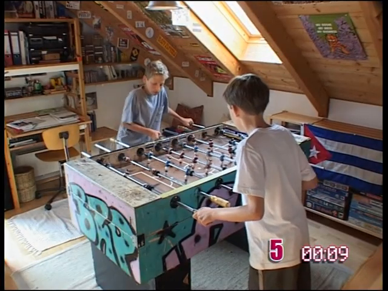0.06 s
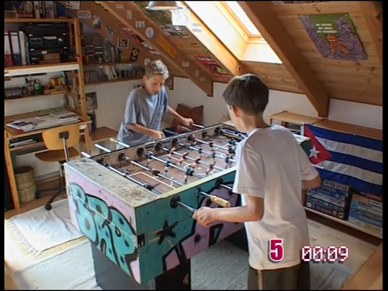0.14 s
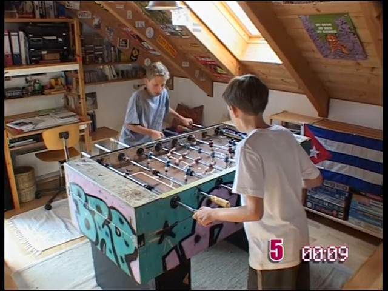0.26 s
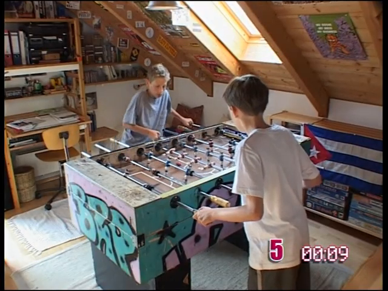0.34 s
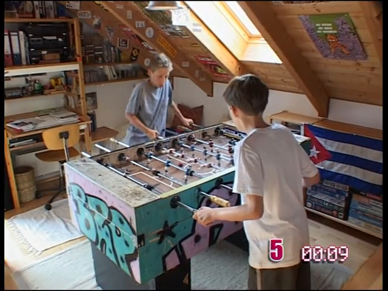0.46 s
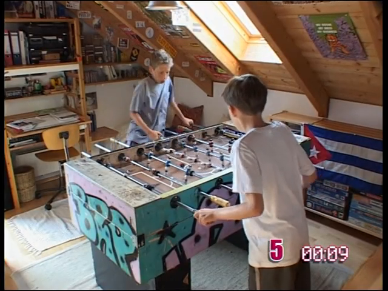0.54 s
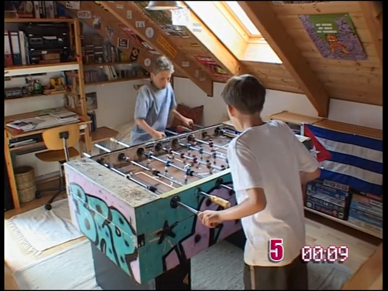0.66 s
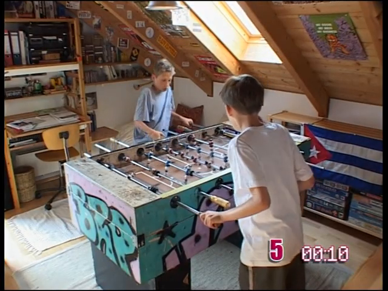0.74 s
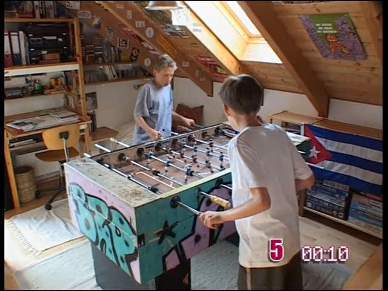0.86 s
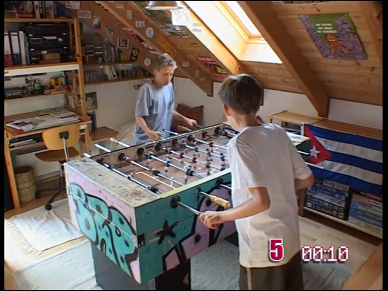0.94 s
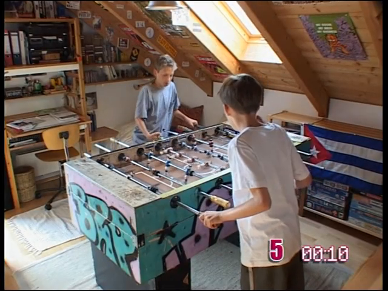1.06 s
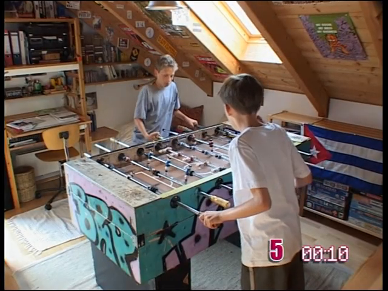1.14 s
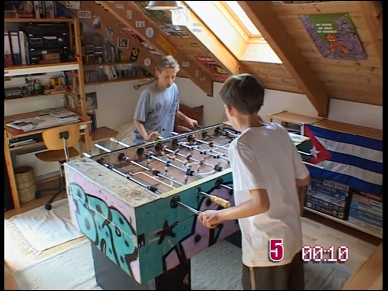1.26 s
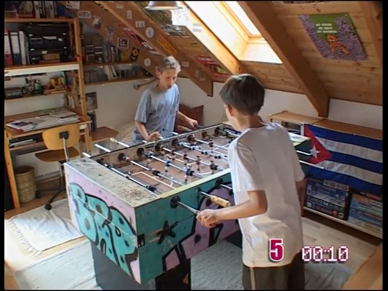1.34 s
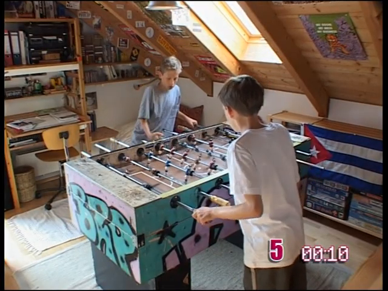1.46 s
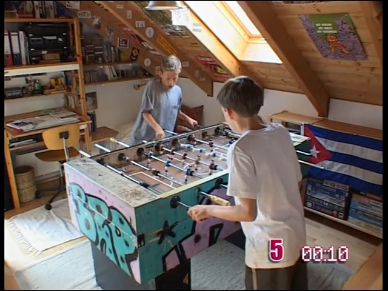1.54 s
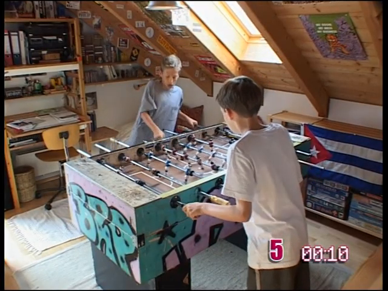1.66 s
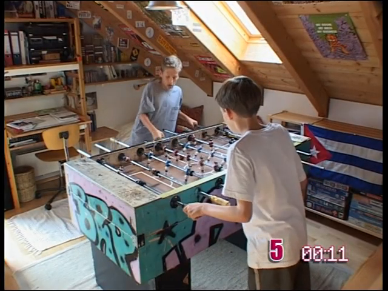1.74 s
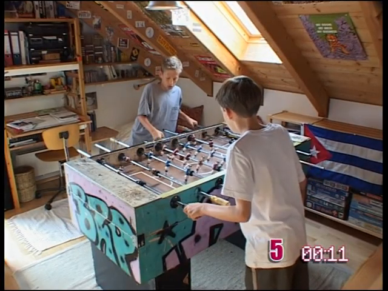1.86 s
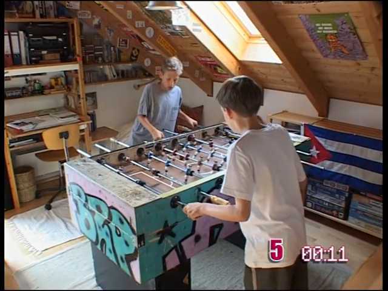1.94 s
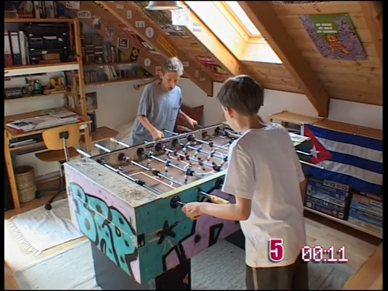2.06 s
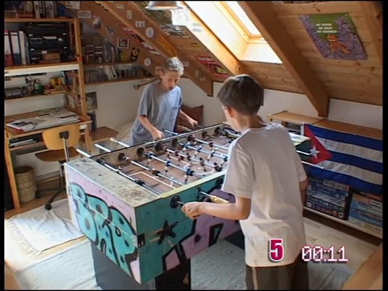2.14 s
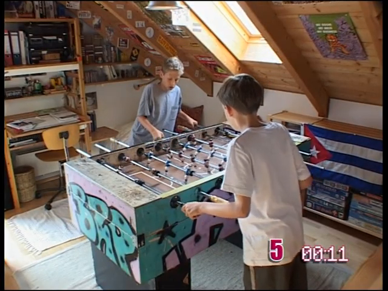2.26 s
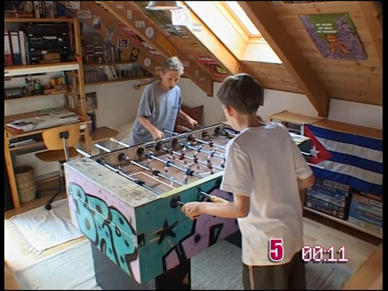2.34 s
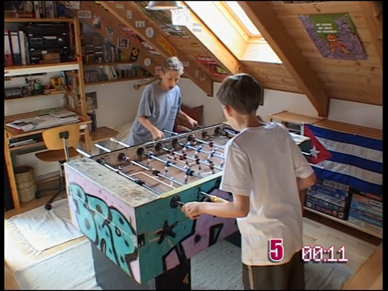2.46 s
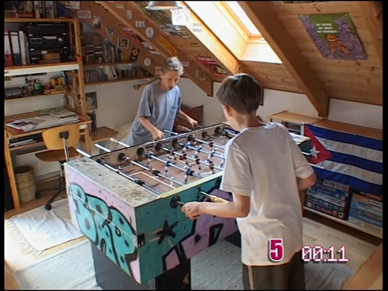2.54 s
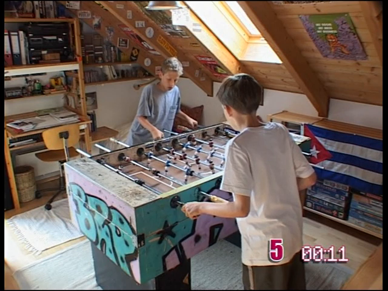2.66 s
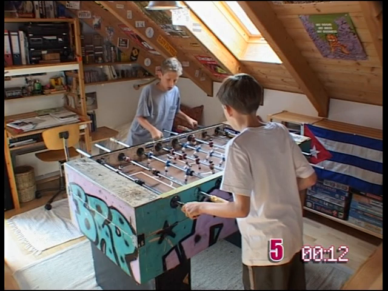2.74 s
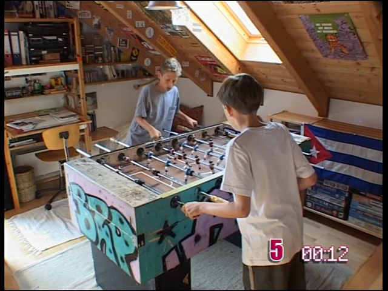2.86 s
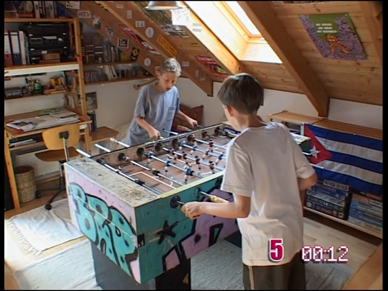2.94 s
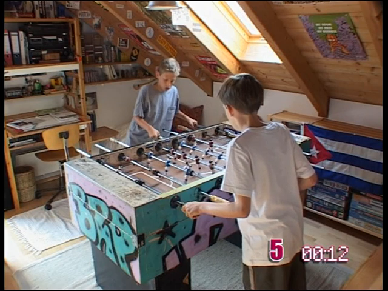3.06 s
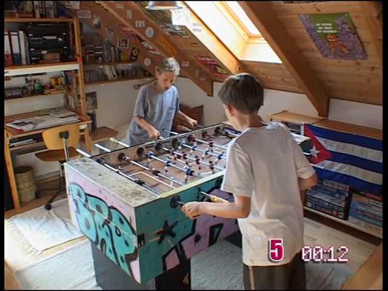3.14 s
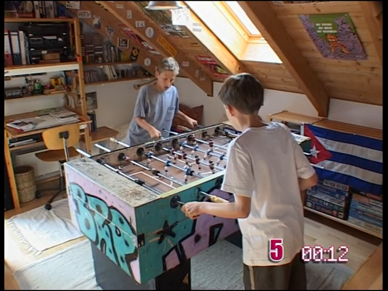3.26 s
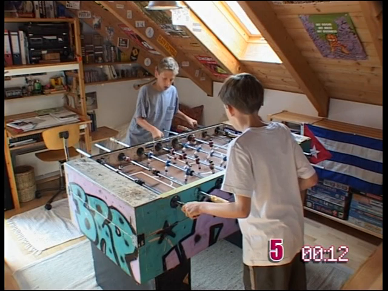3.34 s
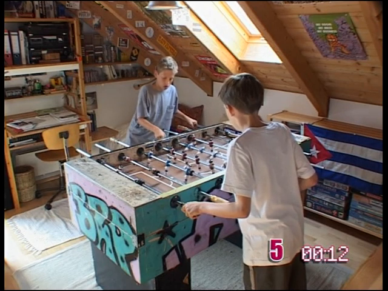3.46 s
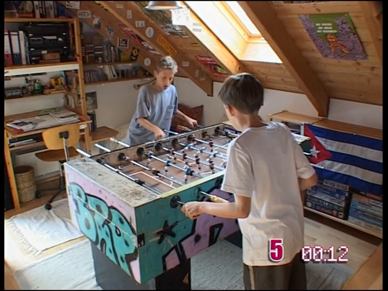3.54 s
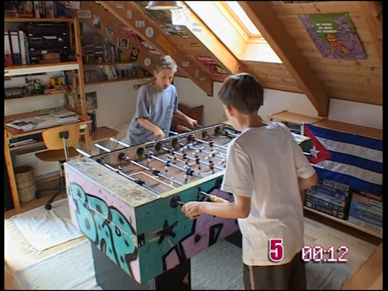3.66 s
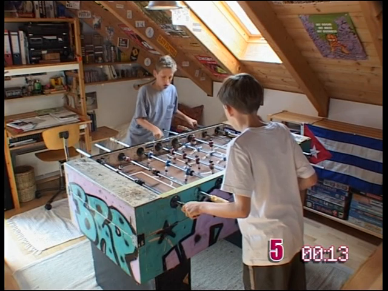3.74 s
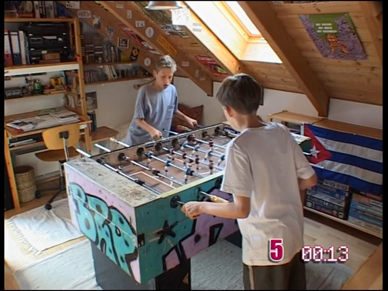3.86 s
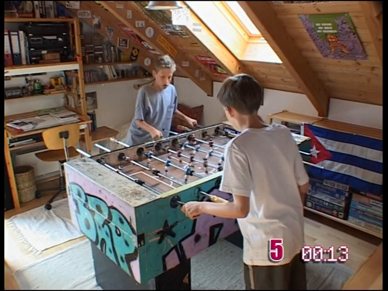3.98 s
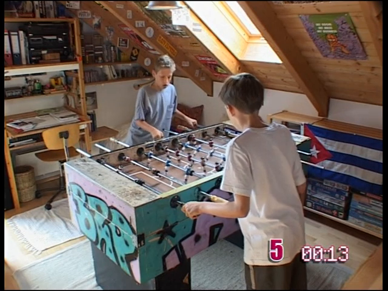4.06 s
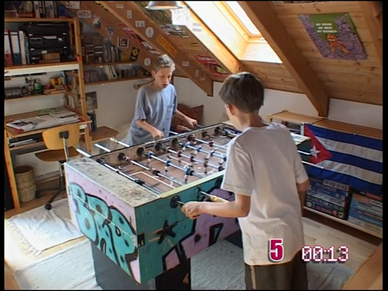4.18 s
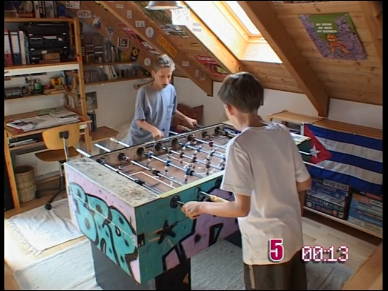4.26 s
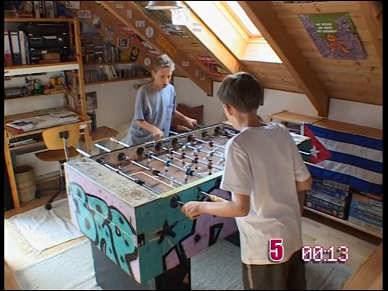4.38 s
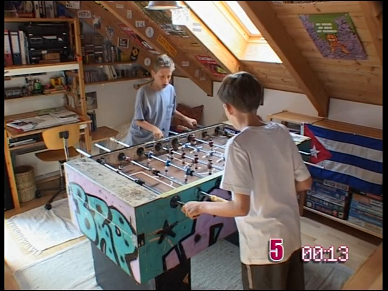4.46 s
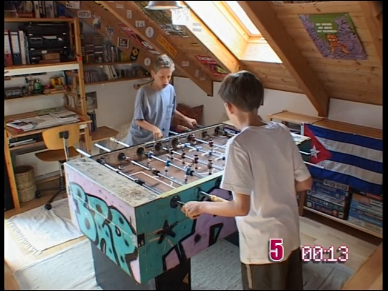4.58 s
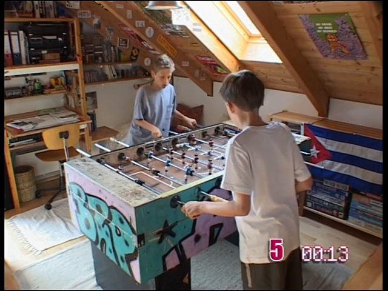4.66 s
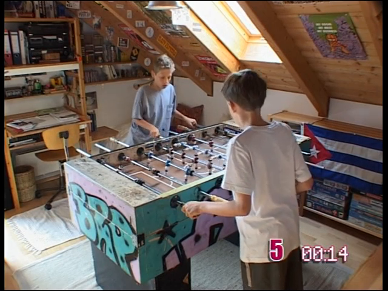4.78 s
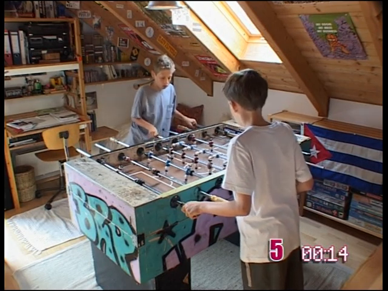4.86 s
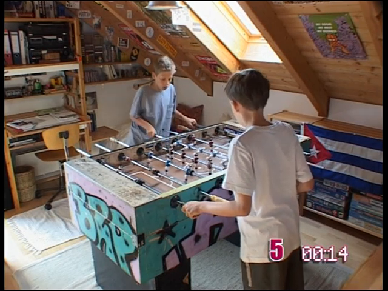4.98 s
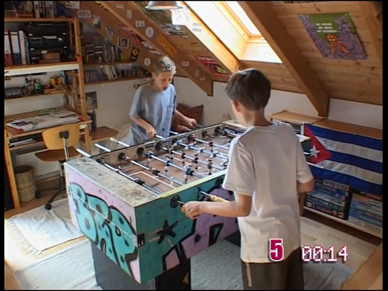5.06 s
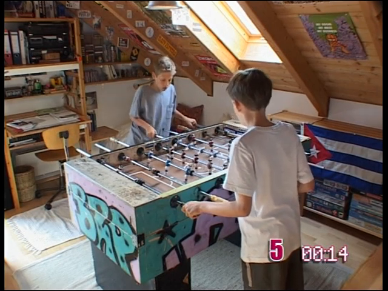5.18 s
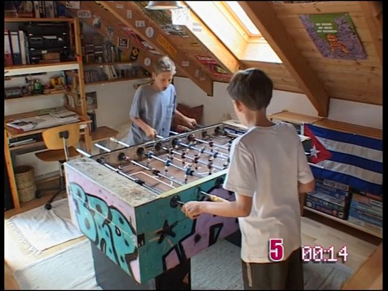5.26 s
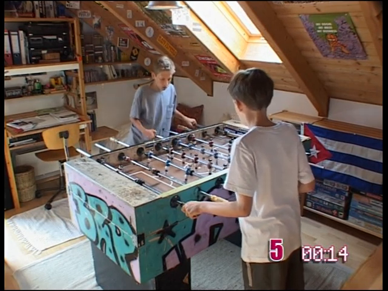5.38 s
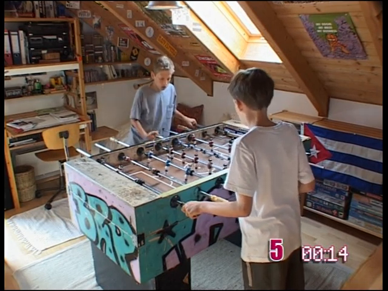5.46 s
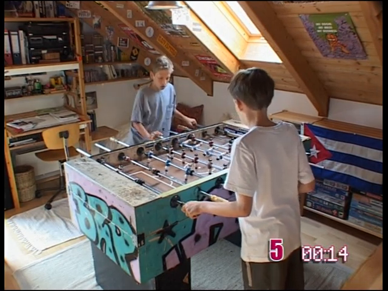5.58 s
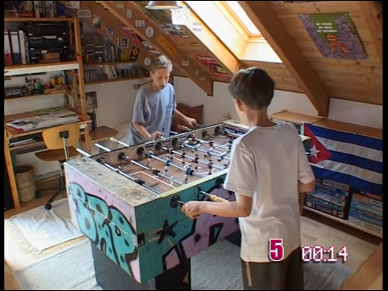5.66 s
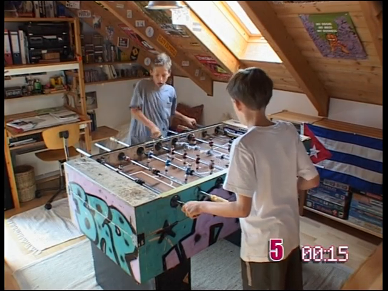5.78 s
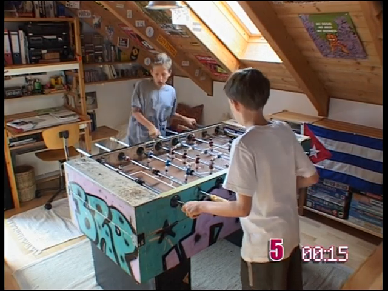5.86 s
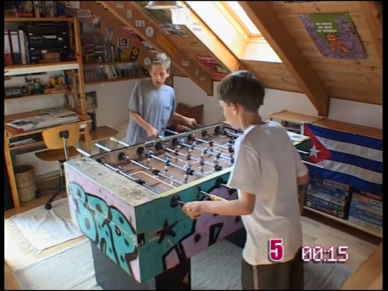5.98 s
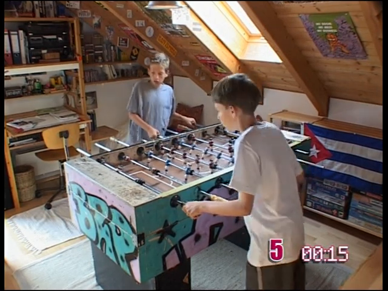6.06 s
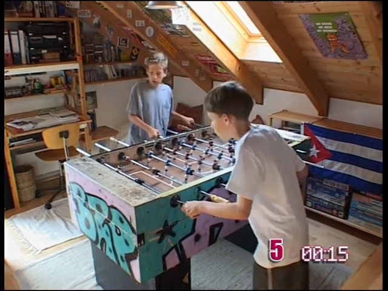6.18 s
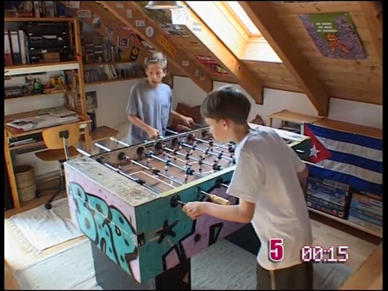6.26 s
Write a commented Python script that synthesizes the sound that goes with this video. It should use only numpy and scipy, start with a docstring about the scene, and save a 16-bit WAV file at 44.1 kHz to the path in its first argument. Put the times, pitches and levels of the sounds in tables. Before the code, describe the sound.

Table football is played in a small wood-lined room, heard from about two metres away. Light taps lead into a burst of hard plastic clacks and hollow wooden knocks that make the table ring and boom. Play thins to a few soft, scattered knocks and faint rod slides, then ends in a loud flurry as the ball slams into the end wall. A faint hum and hiss lie underneath.

```python
"""Knocks from the start, with soft rod slides between them, over a faint hum and hiss: table football
in a wood-lined attic, two metres away. Figures hit the ball and rods bump their stops: the playfield
rings, the cabinet booms, hard shots clack. Rods click in their bearings; a last shot slams into the end
wall. Gain control ducks everything after loud hits."""
import sys
import numpy as np
from scipy import signal
from scipy.fft import rfft, irfft
from scipy.io import wavfile
from scipy.ndimage import uniform_filter1d

SR = 44100
rng = np.random.default_rng(int(sys.argv[2]) if len(sys.argv) > 2 else 0)


def transcribe(signal):
    """Save signal, clipped to [-1, 1], as a 16-bit WAV file at the path in sys.argv[1]."""
    frames = np.atleast_2d(signal).T
    limited = np.clip(frames, -1, 1)
    pcm = np.round(limited * 32767).astype(np.int16)
    wavfile.write(sys.argv[1], SR, pcm)


N = 278271

# Rods and ball sliding. Each row: start in seconds, length in seconds, top level in dB, centre in Hz.
SLIDE_STROKES = [(0.0, 0.3, -60, 536), (0.442, 0.6, -62, 524), (1.154, 0.71, -64, 514),
                 (2.872, 0.23, -62.5, 720), (3.118, 0.21, -64.5, 537), (3.343, 0.24, -62, 695),
                 (4.33, 0.26, -65.5, 550), (4.577, 0.18, -65, 1390), (5.695, 0.4, -59, 640),
                 (5.92, 0.11, -39, 870)]
# Room rumble and hiss. Each row: frequency in Hz, relative density in dB.
FLOOR_SPECTRUM = [(12, -33.5), (20, -3.5), (58, -2.5), (74, -12.5), (104, -10), (150, -15), (172, -24),
                  (216, -2.5), (248, -14.5), (446, -20), (738, -23), (873, -21.5), (1610, -29),
                  (10800, -31.5), (16000, -29.5)]
# Likeness of that noise left and right. Each row: frequency in Hz, correlation.
FLOOR_COHERENCE = [(60, 0.2), (150, 0.9), (380, 0.92), (950, 0.98), (2380, 0.99), (5980, 0.59),
                   (15000, 0.87)]
# Hum. Each row: frequency in Hz, level in dB.
HUM_TONES = [(48.4, -72), (100, -76.5), (142, -73), (216, -67), (350, -78)]
# Thin high hiss. Each row: time in seconds, level in dB.
HISS_ENVELOPE = [(0, -71.5), (0.7, -68.5), (1.6, -68), (2.15, -68.5), (2.26, -89)]
# Ball meets figure or wall. Each row: start in seconds, knock in dB, contact corner in Hz,
# cabinet boom in dB, pitch the struck spot favours in Hz, plastic clack in dB.
BALL_HITS = [ (0.037, -60, 560, -58.5, 300, -84), (0.2508, -47.5, 620, -39, 225, -67),
             (0.2963, -41.5, 1120, -46.5, 590, -70), (0.620, -44.5, 940, -47.5, 738, -71),
             (0.696, -39.5, 360, -55, 274, -79), (0.7237, -22.5, 1790, -40.5, 258, -32),
             (0.781, -25.5, 2100, -39, 1275, -20.5), (1.4462, -37, 600, -39, 230, -60),
             (1.451, -28.5, 970, -29.5, 985, -48.5), (1.594, -33.5, 1050, -39.5, 264, -58),
             (1.766, -29, 1780, -32, 214, -46), (2.493, -43, 540, -35.3, 185, -66),
             (2.884, -64.5, 600, -59, 382, -92), (3.289, -53, 570, -43, 244, -82),
             (3.530, -43.5, 605, -44, 620, -62), (3.956, -41, 1700, -34.5, 290, -63.5),
             (5.0725, -51.5, 820, -51, 240, -66.5), (5.82, -43.5, 1000, -43, 280, -61),
             (5.8297, -19.3, 1490, -25, 268, -16.5), (6.0004, -24, 1270, -40.5, 1020, -33.5),
             (6.126, -26, 1000, -26, 235, -58), ]
# Dense resonances of wood and plastic. Each row: frequency in Hz, relative density in dB.
WOOD_SPECTRUM = [(30, -29), (60, -24), (120, 5), (190, -3.5), (260, -2), (420, -1.5), (700, -2.5),
                 (1100, 0), (2500, 0.5), (5000, -2.5), (8000, -2), (16000, -12)]
PLASTIC_SPECTRUM = [(300, -41), (2000, -18.5), (2700, -13), (3200, -3), (3900, -3.5), (5200, -6),
                    (6200, -15), (8000, -28.5), (11000, -37.5), (16000, -39)]
# Modes of a figure on its steel rod, the playfield with its walls, and the heavy cabinet.
# Each row: frequency in Hz, relative level in dB, T60 in seconds.
FIGURE_MODES = [(3300, -4.5, .2), (3960, 7, 0.22), (3570, -2.5, 0.24), (4199, -1.5, .17), (4380, -4.5, .2),
                (4829, 3, .22), (4860, -11.5, 0.25), (5200, -7, 0.22), (5582, -23.5, .19)]
PLAYFIELD_MODES = [(167, -8, 0.27), (211.5, -10, 0.3), (232.7, 1.5, 0.23), (268.4, -5, 0.35),
                   (287.8, 2, .31), (383.4, -5, 0.29), (452, -6.5, .35), (575.6, -5, 0.25),
                   (598, -21, 0.34), (624, -8, 0.24), (727.5, -6.5, 0.3), (754, -6, 0.17),
                   (920, -20, 0.173), (970, -8.5, 0.33), (1034, -2, 0.16), (1280, -6.5, 0.25),
                   (1440, -21, 0.26), (1670, -15.5, 0.26), (2063, -13.5, 0.17), (2175, -8, .24),
                   (2455, -11.5, .2)]
CABINET_MODES = [(60.6, -13, .4), (81.5, -10.5, 0.66), (98.65, -2.5, 0.37), (111.7, 0, 0.24),
                 (134.5, -11.5, 0.26), (164.7, -6.5, 0.27)]
# Attic decay. Each row: frequency in Hz, T60 in seconds.
ATTIC_DECAY = [(60, 0.4), (160, 0.39), (420, 0.45), (1100, 0.27), (2900, 0.23), (5000, 0.21), (8000, 0.2),
               (15000, 0.126)]
# Direct sound and first reflections off table walls and roof. Each row: delay in seconds, relative gain.
EARLY_PATHS = [(0, 0.96), (.0021, -0.65), (.0065, .55), (0.0121, .35), (0.0245, -0.27)]
# Rods in their bearings. Each row: start in seconds, level in dB, pitch in Hz.
BEARING_CLICKS = [(0.946, -62, 2450), (1.5525, -54, 5000), (1.579, -48.5, 2970), (6.187, -56, 6840),
                  (6.280, -62, 4200)]
# Phase between the capsules. Each row: frequency in Hz, lead of the left in radians.
LEFT_LEAD = [(100, 0.13), (2000, 0.047), (4500, 0.34), (8000, 1.1), (12000, 0.18), (16000, 1.4)]

FLOOR_DB, EDGE_HZ = -57, 16000
FALL_DB_PER_OCT, STEEPEN_DB_PER_OCT2, FALL_REF_HZ = 7.5, 2, 520
HARD_BRIGHTENS_PER_OCT, HARD_DAMPS, BOOM_SHARE = 0.18, 0.2, 0.45
BUMP_DB, MATCH_DB, MATCH_OCT = 1.5, 6.5, 0.5
FIELD_DB, FIELD_FULL_HZ, FIELD_LOSS_DB_PER_OCT = -3.5, 277, 8.5
SPOT_FAVOUR_DB, SPOT_SPREAD_DB, FIGURE_RE_CLACK_DB = 9, 1.5, -10
PING_DB, PING_T60_S, OVERTONE_RATIO, OVERTONE_DB, CLICK_BODY_DB = 15, 0.017, 2.1, -11, -19
SLAM_S, SLAM_HIGHPASS_HZ = 6.0622, 210
AGC_THRESHOLD_DB, AGC_CUT_DB_PER_DB, AGC_RECOVERY_DB_PER_S, AGC_START_DB = -32, 0.28, 2.9, 1.2


def amp(db):
    return 10 ** (np.asarray(db) / 20)


def rms(x):
    return np.sqrt(np.mean(x ** 2) + 1e-20)


def curve_at(points, hz):
    """Interpolate over log frequency."""
    point_hz, value = np.transpose(points)
    return np.interp(np.log(hz + 1), np.log(point_hz), value)


def add(mix, start_s, sound):
    part = mix[max(round(start_s * SR), 0):][:len(sound)]
    part += sound[:len(part)]


def at_level(sound, db):
    """Set the RMS of the first 40 ms."""
    return amp(db) * sound / rms(sound[:SR // 25])


def colour(x, gain_db):
    """Minimum-phase filter: nothing sounds before the blow."""
    log_gain = np.log(amp(np.maximum(gain_db, -100)))
    mirrored = np.concatenate([log_gain, log_gain[-2:0:-1]])
    response = np.exp(np.conj(signal.hilbert(mirrored)))[:len(gain_db)]
    return irfft(rfft(x) * response, len(x))


def noise_band(size, centre_hz, width_oct):
    """Bell-shaped noise band, unit RMS."""
    hz = np.fft.rfftfreq(size, 1 / SR) + 1
    bell = np.exp(-0.5 * (np.log2(hz / centre_hz) / width_oct) ** 2)
    x = irfft(rfft(rng.standard_normal(size)) * bell, size)
    return x / rms(x)


def slide(length_s, db, centre_hz):
    """A rod or the ball rubs: noise that swells fast and fades."""
    size = int(length_s * SR)
    stroke = np.sin(np.pi * np.linspace(0, 1, size) ** 0.56)
    return amp(db) * stroke * noise_band(size, centre_hz, width_oct=0.83)


def background():
    """Room rumble and hiss, a wavering hum, and a thin hiss that drops away after two seconds."""
    hz, t = np.fft.rfftfreq(N, 1 / SR), np.arange(N) / SR
    left, unrelated = rfft(rng.standard_normal((2, N)))
    coherence = np.clip(curve_at(FLOOR_COHERENCE, hz), -1, 1)
    right = coherence * left + np.sqrt(1 - coherence ** 2) * unrelated
    tilt = amp(curve_at([(4000, 0.32), (12000, 2.2)], hz))  # the right capsule hisses more
    floor = irfft(np.array([left / tilt, right * tilt]) * amp(curve_at(FLOOR_SPECTRUM, hz)), N)
    hum = np.zeros(N)
    for tone_hz, db in HUM_TONES:
        waver_rad = 0.19 * noise_band(N, 4.6, width_oct=0.94)
        hum += amp(db) * np.sqrt(2) * np.sin(2 * np.pi * tone_hz * t + waver_rad)
    hiss_db = np.interp(t, *np.transpose(HISS_ENVELOPE))
    hiss = amp(hiss_db) * noise_band(N, 8160, width_oct=0.14)
    return amp(FLOOR_DB) * floor / rms(floor) + hum + hiss


def contact_db(hz, corner_hz, bump_db, fall_db_per_oct):
    """Spectrum of the push: a softer contact lasts longer and excites less treble."""
    octave = np.log2((hz + 1) / corner_hz)
    return bump_db * np.exp(-(octave / 0.3) ** 2) - fall_db_per_oct * np.logaddexp(0, 6 * octave) / 6


def scatter(t, direct, early, early_s, rise_s):
    """An impulse, its quick echoes in the table, and the room tail dying band by band."""
    taps = rng.choice([-1., 1.], len(t)) * (rng.random(len(t)) < 0.25)
    hz, frame_s, bands = signal.stft(taps, SR, nperseg=512)
    bands = bands / (abs(bands) + 1e-9) ** 0.5  # many paths even out the spectrum
    decay = amp(-60 * frame_s / curve_at(ATTIC_DECAY, hz)[:, None])
    tail = signal.istft(bands / rms(abs(bands)) * decay, SR, nperseg=512)[1][:len(t)]
    tail = tail * (1 + early * np.exp(-t / early_s)) * (1 - np.exp(-t / rise_s))
    tail /= np.linalg.norm(tail)
    for delay_s, gain in EARLY_PATHS:
        add(tail, delay_s, [direct * gain])
    return tail


def ring(t, modes, rise_s, feed_db=0):
    """Decaying modes, fed a little differently by every blow."""
    hz, db, t60_s = np.transpose(modes)
    phase = rng.random(hz.shape)
    spread_db = SPOT_SPREAD_DB * rng.standard_normal(hz.shape)
    t = t[:, None]
    waves = amp(db + feed_db + spread_db - 60 * t / t60_s) * np.sin(2 * np.pi * (hz * t + phase))
    return (waves * (1 - np.exp(-t / rise_s))).sum(1)


def blow(knock_db, corner_hz, bump_db, fall_db_per_oct, boom_db, field_db, spot_hz, clack_db):
    """Wooden knock, plastic clack, ringing figure and playfield, and a cabinet that swings up slowly."""
    t = np.arange(2 ** 15) / SR
    hz, field_hz = np.fft.rfftfreq(len(t), 1 / SR), np.transpose(PLAYFIELD_MODES)[0]
    # Upper modes of rods and figures cluster differently at every spot.
    clusters = uniform_filter1d(uniform_filter1d(rng.standard_normal(len(hz)), size=70), size=50)
    cluster_db = 2.2 * clusters / rms(clusters) * hz / (hz + 2000)
    push_db = contact_db(hz, corner_hz, bump_db, fall_db_per_oct)
    wood_paths = scatter(t, direct=0.086, early=0.2, early_s=0.019, rise_s=0.0015)
    wood = colour(wood_paths, curve_at(WOOD_SPECTRUM, hz) + push_db + cluster_db)
    plastic_paths = scatter(t, direct=0.55, early=0.17, early_s=0.013, rise_s=0.00071)
    clack = colour(plastic_paths, curve_at(PLASTIC_SPECTRUM, hz))
    figure = ring(t, FIGURE_MODES, rise_s=0.0013)
    spot_db = SPOT_FAVOUR_DB * np.exp(-(np.log2(field_hz / spot_hz) / 0.26) ** 2)
    feed_db = spot_db + contact_db(field_hz, corner_hz, 0, fall_db_per_oct)
    field = ring(t, PLAYFIELD_MODES, rise_s=0.011, feed_db=feed_db)
    boom = ring(t, CABINET_MODES, rise_s=0.011)
    return (at_level(wood, knock_db) + at_level(clack, clack_db)
            + at_level(figure, clack_db + FIGURE_RE_CLACK_DB)
            + at_level(field, field_db) + at_level(boom, boom_db))


def ball_knock(db, corner_hz, boom_db, spot_hz, clack_db):
    """Hard hits give more treble, less playfield. A corner near the spot's pitch rings hollow."""
    hardness_db = clack_db - db
    fall_db_per_oct = FALL_DB_PER_OCT + STEEPEN_DB_PER_OCT2 * np.log2(corner_hz / FALL_REF_HZ)
    fall_db_per_oct -= HARD_BRIGHTENS_PER_OCT * hardness_db
    bump_db = BUMP_DB + MATCH_DB * np.exp(-(np.log2(spot_hz / corner_hz) / MATCH_OCT) ** 2)
    drive_db = db + BOOM_SHARE * (boom_db - db) - HARD_DAMPS * hardness_db
    low_spot_loss_db = FIELD_LOSS_DB_PER_OCT * max(np.log2(FIELD_FULL_HZ / spot_hz), 0)
    field_db = drive_db + FIELD_DB - low_spot_loss_db
    return blow(db, corner_hz, bump_db, fall_db_per_oct, boom_db, field_db, spot_hz, clack_db)


def rod_click(db, hz):
    """A dry steel ping in the bearing; it hardly stirs the table."""
    body_db = db + CLICK_BODY_DB
    table = blow(db, hz, bump_db=6, fall_db_per_oct=14.5,
                 boom_db=body_db, field_db=body_db, spot_hz=hz, clack_db=body_db)
    modes = [(hz, 0, PING_T60_S), (hz * OVERTONE_RATIO, OVERTONE_DB, PING_T60_S)]
    ping = ring(np.arange(len(table)) / SR, modes, rise_s=0.001)
    return table + amp(db + PING_DB) * ping


def end_wall_slam():
    """The ball cracks against the end wall, too stiff to give bass, and jolts the rods."""
    crack = blow(knock_db=-15, corner_hz=740, bump_db=2.5, fall_db_per_oct=4.5,
                 boom_db=-48, field_db=-18.5, spot_hz=695, clack_db=-45)
    rods = blow(knock_db=-22.5, corner_hz=2330, bump_db=11, fall_db_per_oct=17.5,
                boom_db=-70, field_db=-27.5, spot_hz=2400, clack_db=-48)
    highpass = signal.butter(3, SLAM_HIGHPASS_HZ, "high", fs=SR, output="sos")
    return signal.sosfilt(highpass, crack + rods)


def microphone(x):
    """Two close capsules, the table slightly to the left: the right lags, mainly in the treble."""
    lag = np.exp(-1j * curve_at(LEFT_LEAD, np.fft.rfftfreq(N, 1 / SR)))
    return np.array([x, irfft(rfft(x) * lag, N)])


def scene():
    """The game in stereo over the room's background."""
    game = np.zeros(N)
    for source, events in (slide, SLIDE_STROKES), (ball_knock, BALL_HITS), (rod_click, BEARING_CLICKS):
        for start_s, *settings in events:
            add(game, start_s, source(*settings))
    add(game, SLAM_S, end_wall_slam())
    return microphone(game) + background()


def record(dry):
    """Gain control starts low, cuts fast, recovers slowly; then soft overload and a band limit."""
    pole = np.exp(-1 / (0.0015 * SR))  # 1.5 ms detector
    power_db = 10 * np.log10(signal.lfilter([1 - pole], [1, -pole], (dry ** 2).mean(0)) + 1e-12)
    recovery_db = AGC_RECOVERY_DB_PER_S * np.arange(N) / SR
    wanted_db = AGC_CUT_DB_PER_DB * np.maximum(power_db - AGC_THRESHOLD_DB, 0)
    duck_db = np.maximum.accumulate(np.maximum(wanted_db + recovery_db, AGC_START_DB)) - recovery_db
    ducked = dry * amp(-duck_db)
    clipped = ducked / (1 + (ducked / 0.52) ** 6) ** (1 / 6)
    lowpass = signal.firwin(511, EDGE_HZ, window=("kaiser", 9), fs=SR)
    return signal.oaconvolve(clipped, lowpass[None], "same")


dry = scene()
out = record(dry)
transcribe(out)
```